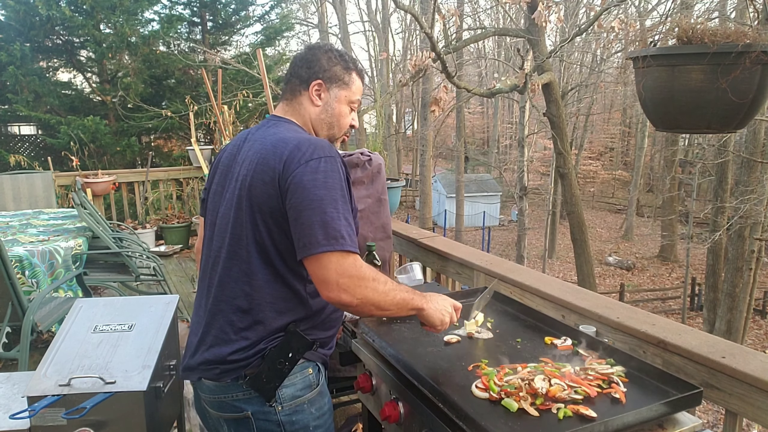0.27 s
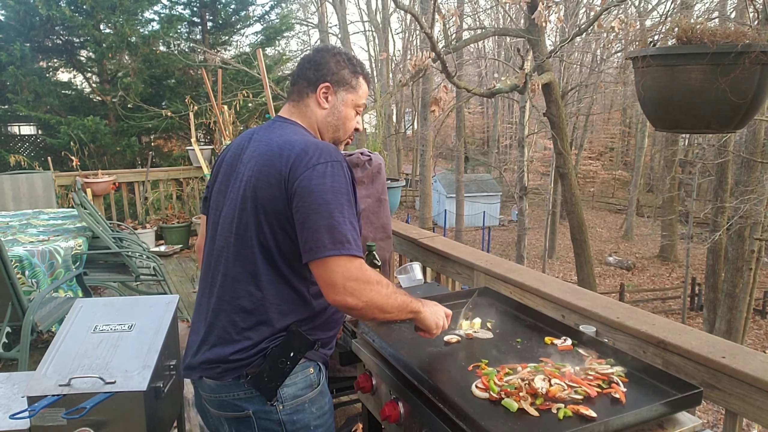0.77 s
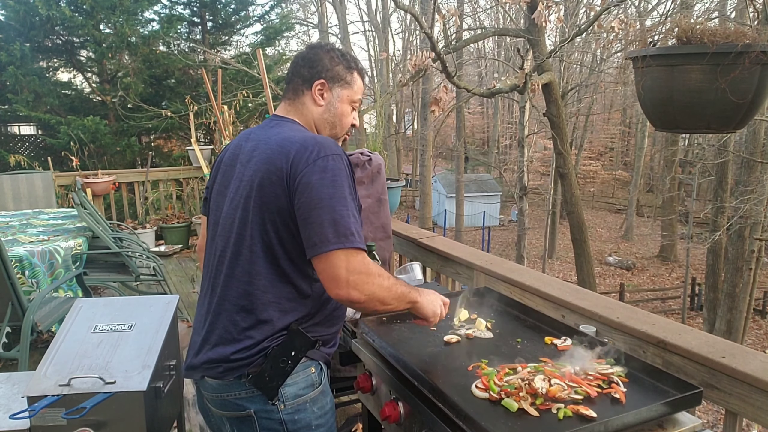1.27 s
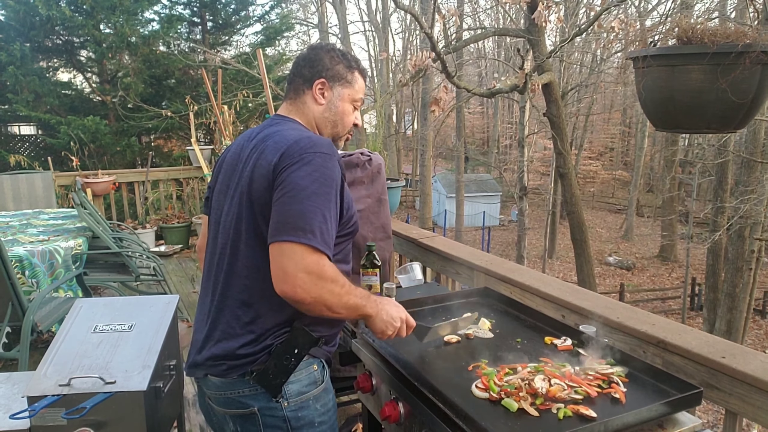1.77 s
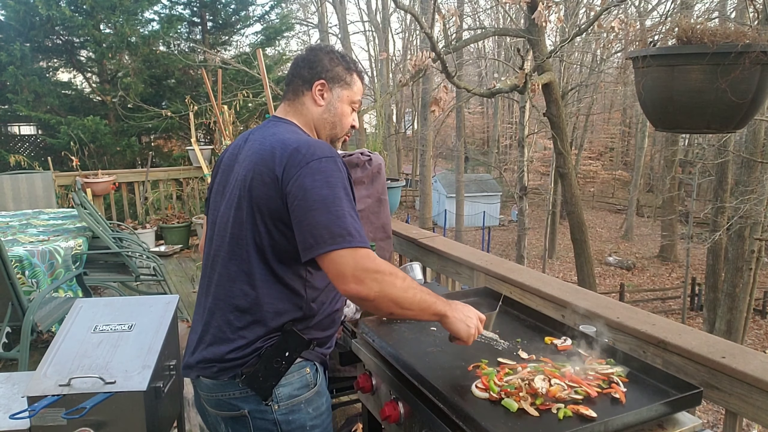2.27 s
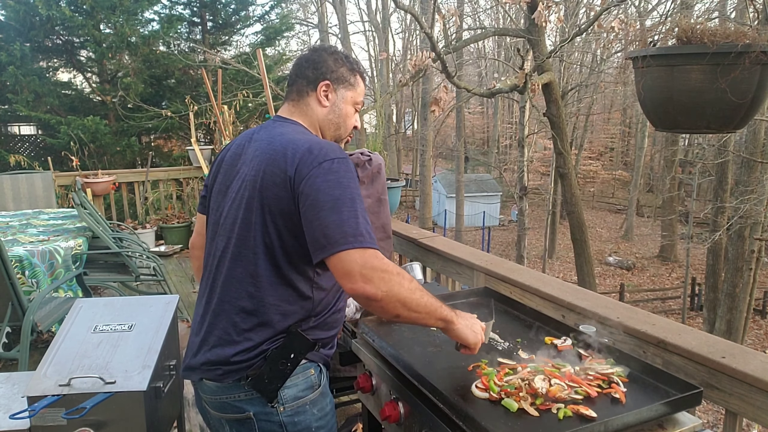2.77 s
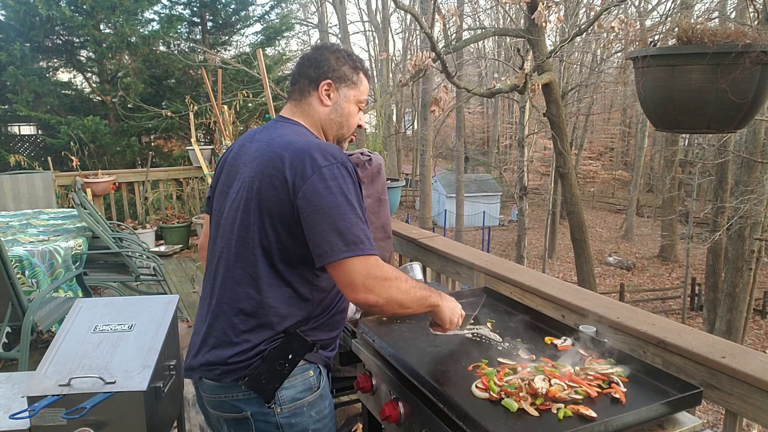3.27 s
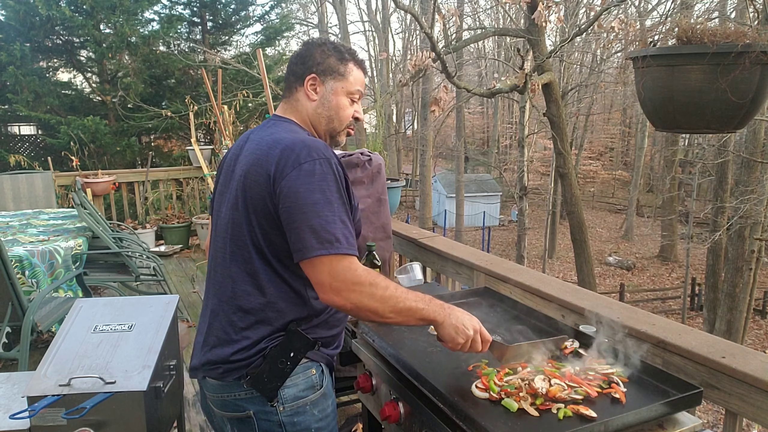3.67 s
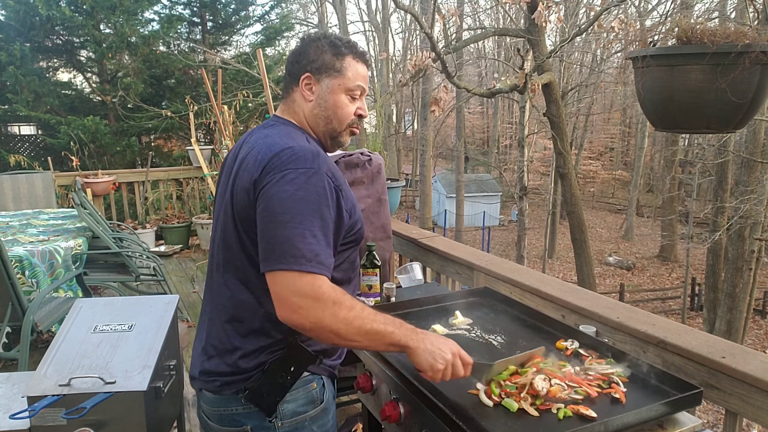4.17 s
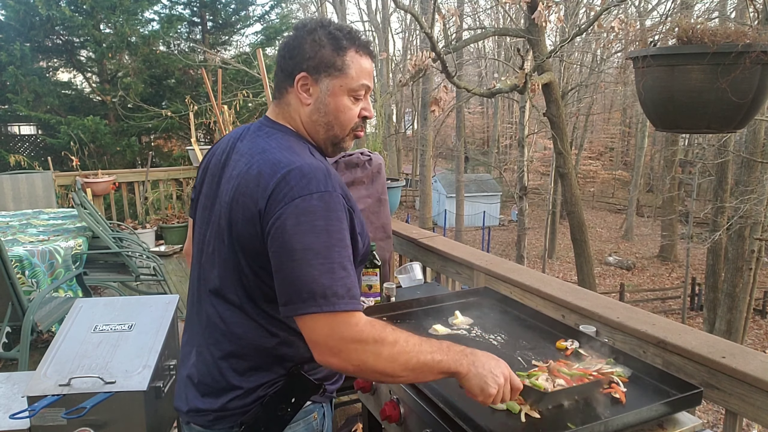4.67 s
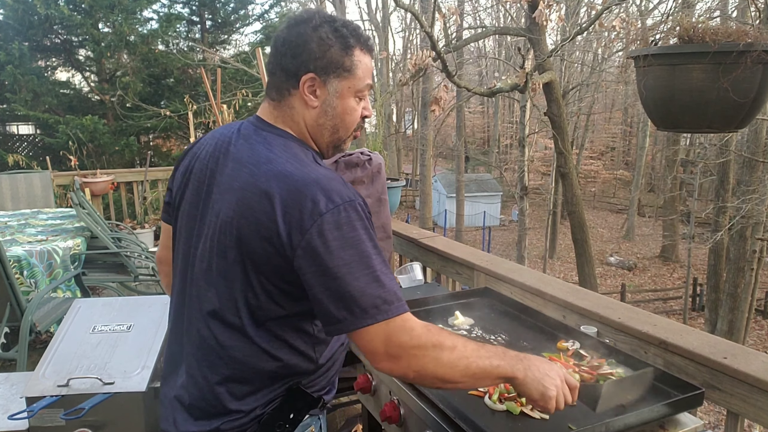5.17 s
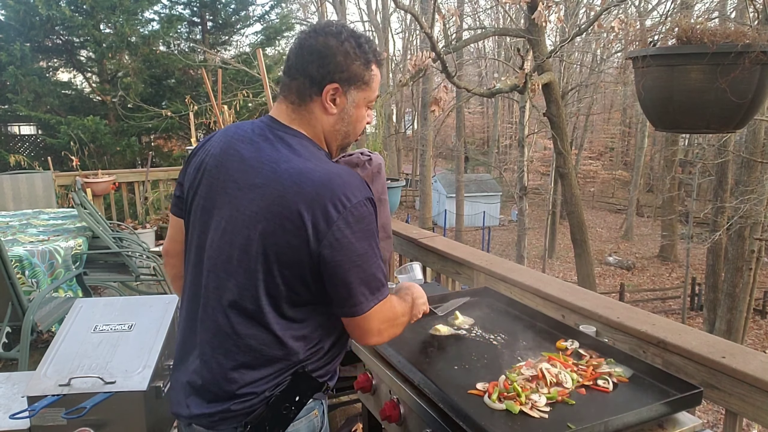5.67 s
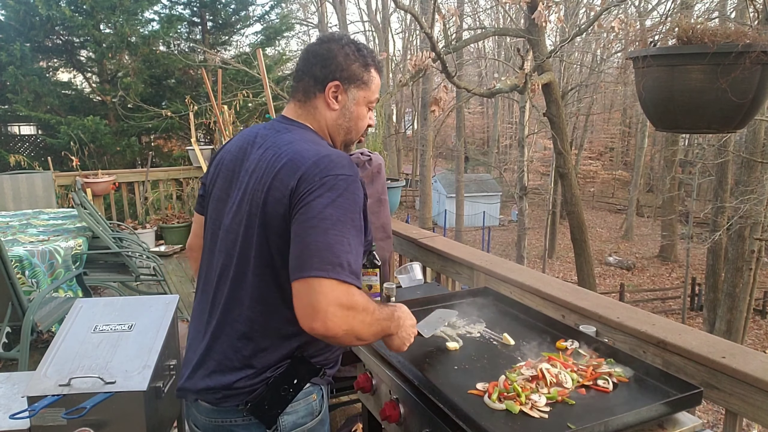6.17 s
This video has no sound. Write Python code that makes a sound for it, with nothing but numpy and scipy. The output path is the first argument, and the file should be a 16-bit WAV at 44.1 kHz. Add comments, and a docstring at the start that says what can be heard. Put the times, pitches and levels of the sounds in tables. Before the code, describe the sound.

Vegetables sizzle on a heavy steel griddle outdoors throughout, a bright, fine hiss with tiny spits that eases slightly over about six seconds. A faint low hum of the burner and distant traffic lies underneath. At about 1.1 seconds a thin metal spatula knocks on the plate with a short ring. Around 1.9 seconds comes a sharper clank, followed by a brief scrape and light clicks. From 3.4 to 3.8 seconds the spatula taps and scrapes in a quick run. More clanks and a short scrape follow at 4.1 to 4.3 seconds, then a bright clatter at 4.6 to 4.8. The sizzle swells a little around 3.5, 4.3 and 4.9 seconds. A last quick cluster of knocks lands near 5.25 seconds, and the frying and hum continue to the end. The griddle sounds brighter on the left.

```python
"""A thin steel spatula knocks and scrapes on a heavy flat griddle outdoors. Each touch excites the
damped normal modes of the plate (dense, low and middle) and of the blade (high and sharp).
Vegetables sizzle as tiny bubbles burst on the hot steel; far traffic and the burner hum below.
Of two spaced microphones, the left hears the griddle first and brighter."""
import sys
import numpy as np
from scipy import signal
from scipy.fft import rfft, irfft, next_fast_len
from scipy.io import wavfile

SR = 44100
rng = np.random.default_rng(int(sys.argv[2]) if len(sys.argv) > 2 else 0)


def log_audio(samples):
    """Write samples as a 16-bit WAV file to the path given in sys.argv[1]."""
    # one column per channel
    frames = np.atleast_2d(samples).T
    # limit to full scale, then quantise
    limited = np.clip(frames, -1, 1)
    pcm = np.round(limited * 32767).astype(np.int16)
    wavfile.write(sys.argv[1], SR, pcm)


N = 283122

# Spectrum of traffic and burner: f/Hz, relative density/dB
HUM_SPECTRUM = [(15, -66), (25, -45), (40, -15.5), (64, 1), (129, -10), (221, -17), (257, -17.5),
                (337, -21.5), (386, -22.5), (674, -20.5), (743, -16.5), (991, -17), (1230, -25.5),
                (2500, -22), (3250, -41), (5500, -120)]
# The traffic swells and draws away: t/s, level/dB
HUM_ENVELOPE = [(0, -40), (.7, -42), (1.5, -40.5), (2.4, -42.5), (3.5, -42.5), (4.9, -44), (6.42, -43.5)]
# Spectrum of the frying: f/Hz, relative density/dB
SIZZLE_SPECTRUM = [(710, -52), (1200, -8.5), (1690, -13), (1980, -18.5), (2320, -27), (2610, -15),
                   (3870, -8.5), (4640, -11.5), (7260, -8.5), (8700, -9.5), (10900, -1.5), (13300, 4),
                   (15300, -0.5)]
# The frying flares when food is pushed onto hot steel: peak t/s, rise/dB
FRYING_FLARES = [(1.0, 0.4), (2.0, 1), (3.55, 3), (4.33, 3), (4.88, 4), (6.05, 1.5)]
# Upper edges of the boom, plate and bite ranges (the blade range lies above): f/Hz
RANGE_EDGES = [900, 2350, 6300]
# Bands of the steel's many unresolved modes: f/Hz, relative density/dB, T60/s
DIFFUSE_BANDS = [(216, -11, 0.6), (440, -1, 0.55), (724, 7, 0.55), (1054, -1, 0.38), (1810, 2, 0.43),
                 (2680, -1, 0.35), (3790, -6, 0.29), (5200, -10.5, 0.18), (7000, -10, 0.17),
                 (12100, -8, 0.21), (13900, -4, 0.09)]
# Normal modes of the griddle: f/Hz, relative level/dB, T60/s
GRIDDLE_MODES = [(260, -4, .55), (282, -4, .4), (316, -3, .5), (490, -4, .35), (534, -3, .55),
                 (586, -4, .45), (950, -11, .3), (1174, -10, .3), (1478, -8, .4), (1679, -4, .55),
                 (1731, -6, .35), (1830, -10, .3), (1945, -6, .3), (2105, -8, .3), (2224, -5, .3),
                 (2350, -8, .3), (2430, -11, .3), (2560, -10, .25), (2620, -11, .25), (2697, -11, .22),
                 (2762, -11, .22), (2842, -11, .22), (2955, -6, .22), (3060, -8, .2), (3130, -10, .2),
                 (3250, -11, .16), (3327, -10, .22), (3680, -12, .2), (3910, -11, .2), (4300, -14, .2),
                 (4600, -13, .18), (4960, -16, .18), (5610, -16, .15)]
# Normal modes of the blade: f/Hz, relative level/dB, T60/s
SPATULA_MODES = [(7690, -15, .12), (8355, -14, .14), (8480, -16, .14), (8920, -13, .13), (9290, -13, .1),
                 (9870, -15, .09), (10280, -10, .11), (10510, -12, .12), (10970, -9, .1), (11140, -8, .12),
                 (11430, -7, .1), (11540, -9, .1), (12040, -9, .09), (12410, -6, .1), (12650, -11, .08),
                 (12850, -11, .08), (13300, -6, .09), (13750, -8, .09), (14150, -9, .08), (14380, -6, .1),
                 (15250, -9, .07)]
# Scrapes: start t/s, hold/s, plate-range drive/dB, bite and blade re plate/dB
SPATULA_STROKES = [(1.916, 0.015, -46, 2, 10), (1.963, 0.071, -54, 8, 21.5), (3.438, 0.06, -43.5, -3, 4),
                   (3.515, 0.054, -46, 5.5, -8), (3.618, 0.05, -41, 6.5, 7.5), (3.728, 0.024, -45.5, 4, 17),
                   (4.126, 0.07, -40, 2.5, 12), (4.21, 0.11, -48, -15, 1), (4.715, 0.034, -40, -6, 6)]
# Knocks: t/s, plate-range drive/dB, boom, bite and blade re plate/dB, contact time/s,
# shift from clatter to ring for plate and blade/dB, favoured plate f/Hz, two favoured blade f/Hz
SPATULA_KNOCKS = [(1.123, -22, -8.5, -3.5, -22, 0.012, 5.5, 8, 1679, 10280, 12410),
                  (1.8933, -24.5, -11.5, -1.5, 2.5, 0.0009, 2, -3, 1174, 7700, 14300),
                  (1.984, -47, -8, -3, 13, .004, -6, 12, 2224, 14380, 12410),
                  (1.9993, -40, -16, 2, 8, 0.0004, 6, 8, 2224, 11140, 12410),
                  (2.038, -47, -8, -8, 14, 0.004, 0, 14, 950, 13330, 13330),
                  (2.0505, -45, -10, -9, 4, 0.0011, -16, 6, 950, 13330, 11140),
                  (3.362, -28.5, -7.5, -3, -13, 0.0022, 3, 0, 2760, 12410, 14200),
                  (3.41, -43, -10, 1, -1, 0.0034, 11, 2, 1679, 13750, 14200),
                  (3.532, -43, -14, 4, 0, .002, 7, 0, 3320, 13750, 12050),
                  (3.574, -33.5, -8, -2, -6, 0.0027, 6, 0, 2380, 13750, 13280),
                  (3.595, -46, -7, 4, -2, 0.0027, 8, 0, 3060, 13750, 12050),
                  (3.675, -33, -15, -1, -5, 0.0014, 3, 0, 534, 12850, 14200),
                  (3.73, -43, -9, 0, 13, .002, 2, 1, 2430, 14200, 12650),
                  (3.753, -41, -12, 7, 8, .003, 10, 0, 3900, 10970, 12650),
                  (4.1103, -30, -12, 7.5, -0.5, 0.0025, 0.5, 4, 280, 10970, 14380),
                  (4.1169, -24, -14.5, -1.5, 2.5, 0.002, 6.5, 4, 1160, 12410, 14380),
                  (4.172, -44, -6, 2, 9, .004, 6, 12, 534, 13280, 11430),
                  (4.19, -44, -6, 2, 11, .003, 6, 10, 1945, 14380, 12050),
                  (4.205, -45, -3, 6, 5, 0.0035, 10.5, 4, 260, 14380, 13280),
                  (4.6415, -27, -27, -6, 12.5, 0.005, -0.5, 4, 1478, 12600, 11800),
                  (4.649, -30, -19, 6.5, 11.5, 0.0055, -1, 6, 2840, 8340, 10400),
                  (4.665, -51, -24, 1, 0, .003, 3, 4, 3320, 11500, 8400),
                  (4.68, -35, -11, 7.5, -4, 0.0023, 7, 6, 3320, 8400, 10280),
                  (4.7252, -32, -15, -6, 2.5, 0.006, 2.5, 5, 950, 10510, 13280),
                  (4.768, -39, -18, 5, 6, .003, 6, 6, 2840, 10510, 14380),
                  (5.2341, -27, -25, 2, -2.5, 0.0051, -1, 2, 2360, 11430, 14380),
                  (5.239, -25, -22, 2.5, -7, 0.0044, 2.5, 4, 2955, 11300, 12600),
                  (5.266, -30.5, -15, 2.5, -2, .004, -1, 0, 2955, 11430, 14380)]
# Coherence between the microphones: f/Hz, for steady sound/1, for the struck steel/1
COHERENCE = [(61.4, 1, 0.63), (250, 0.89, 0.54), (500, 0.54, 1), (990, 0.014, 1), (2660, 0.53, 0.042),
             (5230, 0.04, 0.11), (12000, 0.019, 0.56)]
# Level difference between the microphones: f/Hz, left minus right/dB
MIC_BALANCE = [(60, 1), (130, 1.5), (290, 1.5), (640, 0.5), (1410, 1), (3100, 0), (6820, 7), (15000, 9)]

SIZZLE_DB, COOLING_DB_PER_S = -30.5, 0.45
FLARE_RISE_S, FLARE_FALL_S = 0.15, 0.3
STROKE_ATTACK_S, STROKE_RELEASE_S, STROKE_BOOM_DB = 0.0017, 0.017, -9
RASP_DB, RASP_HZ = 5, 30  # the edge catches and slips
TICK_DB, TICK_DB_PER_CONTACT_S, TICK_DECAY_S, TICK_LOW_HZ = 18, -4000, 0.002, 11000
FAVOUR_DB, FAVOUR_OCTAVES = 8, 0.03  # the spot struck favours the modes near one or two pitches
KNOCK_SCATTER_DB, STROKE_SCATTER_DB = 3, 4  # how unevenly the modes are excited
RIGHT_LAG_S, SOFT_LIMIT, CUTOFF_HZ = 7 / SR, 0.85, 15550


def amp(db):
    """Amplitude ratio of a level in decibels."""
    return 10 ** (np.asarray(db) / 20)


def unit_rms(x):
    """Normalisation to unit mean power."""
    return x / np.sqrt(np.mean(x ** 2) + 1e-20)


def at_hz(table, hz, column=1):
    """Interpolation of a table column on a logarithmic frequency axis."""
    table = np.array(table)
    return np.interp(np.log(hz + 1), np.log(table[:, 0]), table[:, column])


def drift(corner_hz):
    """Slow random fluctuation: first-order low-pass noise of about unit rms."""
    steps_per_s = 60
    steps = rng.standard_normal(int(N / SR * steps_per_s) + 2)
    pole = np.exp(-2 * np.pi * corner_hz / steps_per_s)
    slow = unit_rms(signal.lfilter([1], [1, -pole], steps))
    return np.interp(np.arange(N) / SR * steps_per_s, np.arange(len(slow)), slow)


def shot_noise(per_s, spread_db):
    """A Poisson process: independent clicks of uneven size, at unit rms."""
    sizes = amp(spread_db * np.minimum(rng.exponential(1, N), 4)) * rng.choice([-1, 1], N)
    return unit_rms(sizes * (rng.random(N) < per_s / SR))


def stereo_field(first, second, coherence_column, spectrum=None):
    """Partial coherence: two independent signals mix into a left-right pair, coloured if asked."""
    size = next_fast_len(N)
    hz = np.arange(size // 2 + 1) * SR / size
    coherence = at_hz(COHERENCE, hz, coherence_column)
    left, independent = rfft(first, size), rfft(second, size)
    right = coherence * left + np.sqrt(1 - coherence ** 2) * independent
    colour = 1 if spectrum is None else amp(at_hz(spectrum, hz))
    return irfft(colour * np.array([left, right]), size)[:, :N]


def traffic_hum():
    """Far traffic and the burner superpose as low-frequency noise with a slowly varying level."""
    noise = rng.standard_normal((2, N))
    level_db = np.interp(np.arange(N) / SR, *np.transpose(HUM_ENVELOPE)) + 0.27 * drift(5.2)
    return amp(level_db) * unit_rms(stereo_field(*noise, coherence_column=1, spectrum=HUM_SPECTRUM))


def sizzle():
    """Bursting bubbles and lone spits of fat are shot noise over a steam hiss that flares and calms."""
    t = np.arange(N) / SR
    level_db = SIZZLE_DB - COOLING_DB_PER_S * t
    for peak_s, rise_db in FRYING_FLARES:
        width_s = np.where(t < peak_s, FLARE_RISE_S, FLARE_FALL_S)
        level_db += rise_db * np.exp(-((t - peak_s) / width_s) ** 2)
    spits = amp(-23) * shot_noise(25, spread_db=5)
    level_db += 0.72 * drift(5.6)
    sides = []
    for _ in range(2):
        bubbles = shot_noise(9000, spread_db=2)
        steam = 1.43 * rng.standard_normal(N)
        sides.append(bubbles + steam + spits)
    return amp(level_db) * unit_rms(stereo_field(*sides, coherence_column=1, spectrum=SIZZLE_SPECTRUM))


def stroke_forces(chatter):
    """Stick-slip friction: an uneven rasp follows the pressure of each stroke, one row per range."""
    t, forces = np.arange(N) / SR, np.zeros((4, N))
    rasp = chatter * amp(RASP_DB * drift(RASP_HZ))
    for start_s, hold_s, plate_db, bite_db, blade_db in SPATULA_STROKES:
        lifted_s = np.maximum(t - start_s - STROKE_ATTACK_S - hold_s, 0)
        pressure = np.clip((t - start_s) / STROKE_ATTACK_S, 0, 1) * np.exp(-lifted_s / STROKE_RELEASE_S)
        strength = amp(plate_db + np.array([STROKE_BOOM_DB, 0, bite_db, blade_db]))
        forces += strength[:, None] * pressure * rasp
    return forces


def knock_forces(chatter):
    """An impact divides into a brief decaying clatter and a clean impulse, in each of the four ranges."""
    t, clatter, impulses = np.arange(SR // 10) / SR, np.zeros((4, N)), []
    for knock in SPATULA_KNOCKS:
        start_s, plate_db, boom_db, bite_db, blade_db, contact_s, plate_ring_db, blade_ring_db = knock[:8]
        start = round(start_s * SR)
        span = slice(start, start + len(t))
        strength = amp(plate_db + np.array([boom_db, 0, bite_db, blade_db]))
        touch = chatter[span] * np.exp(-t / contact_s)
        touch[0] = 1.1  # the first contact
        touch /= np.linalg.norm(touch)
        # where and how flat the edge lands shares the blow between clear modes and clatter
        clarity = amp(np.array([plate_ring_db] * 3 + [blade_ring_db]) / 2)
        clatter[:, span] += (strength / clarity)[:, None] * touch
        impulses.append(strength * clarity)
    return clatter, np.array(impulses)


def diffuse_ring(forces):
    """Modal overlap: each band of the steel stores energy and releases it as decaying noise."""
    out, white = np.zeros((2, N)), rng.standard_normal((2, 2, N))
    for k, (hz, level_db, t60) in enumerate(DIFFUSE_BANDS):
        bandpass = signal.butter(2, [hz / 1.216, hz * 1.416], "band", fs=SR, output="sos")
        force = forces[np.searchsorted(RANGE_EDGES, hz)]
        retention = amp(-60 / (t60 * SR)) ** 2
        energy = signal.lfilter([1], [1, -retention], force ** 2 + 1e-18)
        tail = np.sqrt(energy) * signal.sosfilt(bandpass, white[k % 2])
        front = amp(14) * signal.sosfilt(bandpass, force + 1e-18)  # the first wave front is the sharpest
        out += amp(level_db) * (tail + front)
    return stereo_field(*out, coherence_column=2)


def resonator(force, hz, t60):
    """Forced response of a damped harmonic oscillator."""
    radius, angle = amp(-60 / (t60 * SR)), 2 * np.pi * hz / SR
    return signal.lfilter([0, np.sin(angle)], [1, -2 * radius * np.cos(angle), radius ** 2], force + 1e-18)


def modal_ring(impulses, friction, modes, favoured_hz, gain_db):
    """Modal superposition: each knock excites the modes in its own proportions; friction wanders."""
    out = np.zeros((2, N))
    onsets = [round(knock[0] * SR) for knock in SPATULA_KNOCKS]
    scatter_db = KNOCK_SCATTER_DB * rng.standard_normal((len(onsets), len(modes)))
    for k, (hz, mode_db, t60) in enumerate(modes):
        band = np.searchsorted(RANGE_EDGES, hz)
        nearness = np.exp(-(np.log2(hz / favoured_hz) / FAVOUR_OCTAVES) ** 2).max(axis=0)
        force = friction[band] * amp(STROKE_SCATTER_DB * drift(15))
        force[onsets] += impulses[:, band] * amp(FAVOUR_DB * nearness + scatter_db[:, k])
        tone = resonator(force * amp(mode_db + gain_db), hz, t60)
        out[0] += tone
        out[1] += np.roll(tone, rng.integers(0, 6)) * amp(1.6 * drift(3.5))  # its own phase and level
    return out


def contact_ticks():
    """Onset transient of edge on steel: the shorter the contact, the stronger the bright burst."""
    t, out = np.arange(SR // 50) / SR, np.zeros((2, N))
    bursts = rng.standard_normal((len(SPATULA_KNOCKS), 2, len(t))) * np.exp(-t / TICK_DECAY_S)
    for (start_s, plate_db, _, _, blade_db, contact_s, *_), burst in zip(SPATULA_KNOCKS, bursts):
        start = round(start_s * SR)
        level_db = plate_db + blade_db + TICK_DB + TICK_DB_PER_CONTACT_S * contact_s
        out[:, start:start + len(t)] += amp(level_db) * burst
    highpass = signal.butter(2, TICK_LOW_HZ, "high", fs=SR, output="sos")
    return signal.sosfilt(highpass, out + 1e-18)


def spatula_on_griddle():
    """Action and reaction: the same impacts and friction set both plate and blade vibrating."""
    chatter = shot_noise(2500, spread_db=4)
    clatter, impulses = knock_forces(chatter)
    friction = stroke_forces(chatter)
    diffuse = diffuse_ring(amp(3.5) * clatter + amp(-24) * friction)
    modal_drive = amp(9) * impulses, amp(-18) * friction
    favoured_hz = np.array(SPATULA_KNOCKS).T[-3:]
    plate = modal_ring(*modal_drive, GRIDDLE_MODES, favoured_hz[:1], gain_db=-18.5)
    blade = modal_ring(*modal_drive, SPATULA_MODES, favoured_hz[1:], gain_db=-14.5)
    return diffuse + plate + blade


def scene():
    """Linear superposition of the ringing steel, the frying and the hum."""
    return spatula_on_griddle() + sizzle() + traffic_hum() + contact_ticks()


def record(dry):
    """Path difference and shading make the right side later and duller; peaks round off, the top is cut."""
    size = next_fast_len(N + 512)
    hz = np.arange(size // 2 + 1) * SR / size
    half_balance = amp(at_hz(MIC_BALANCE, hz) / 2)
    delay = np.exp(-2j * np.pi * hz * RIGHT_LAG_S)
    response = np.array([half_balance, delay / half_balance])
    at_mics = irfft(rfft(dry, size) * response, size)[:, :N]
    rounded = SOFT_LIMIT * np.tanh(at_mics / SOFT_LIMIT)
    lowpass = signal.ellip(12, 0.3, 70, CUTOFF_HZ, fs=SR, output="sos")
    return signal.sosfilt(lowpass, rounded)


dry = scene()
out = record(dry)
log_audio(out)
```